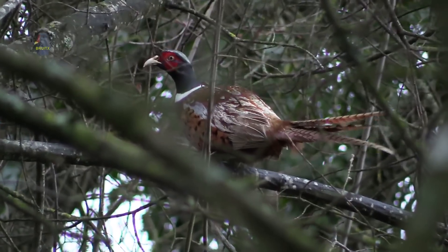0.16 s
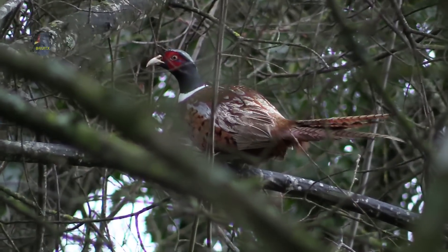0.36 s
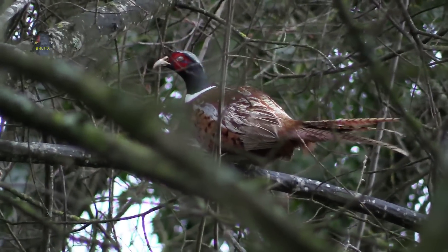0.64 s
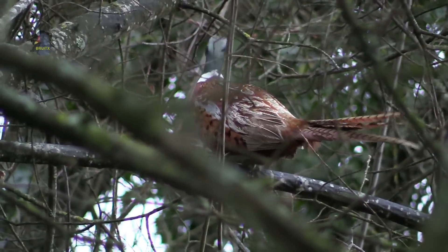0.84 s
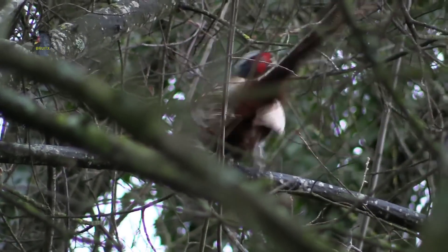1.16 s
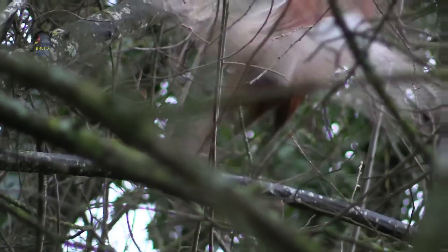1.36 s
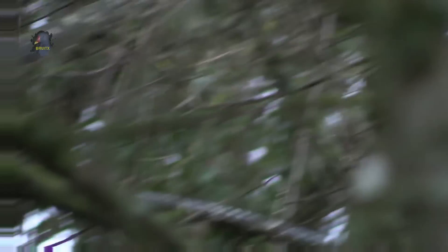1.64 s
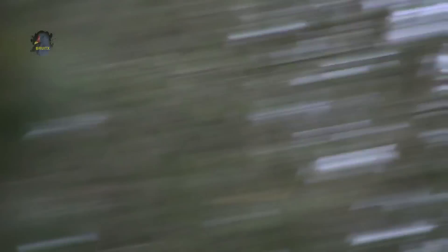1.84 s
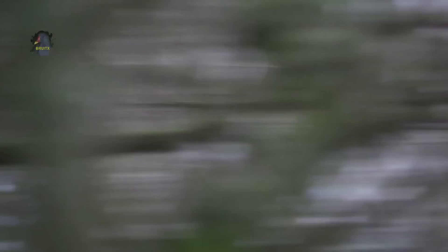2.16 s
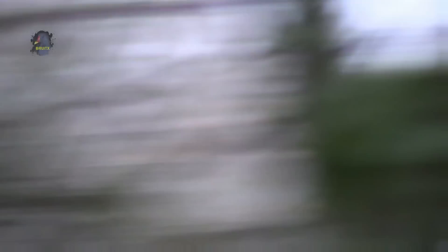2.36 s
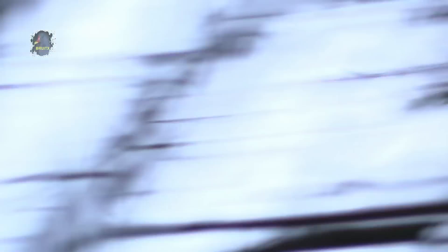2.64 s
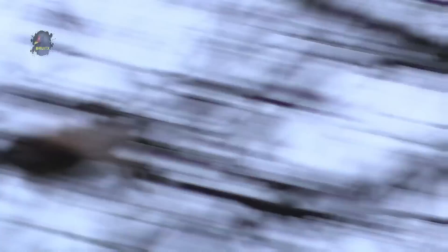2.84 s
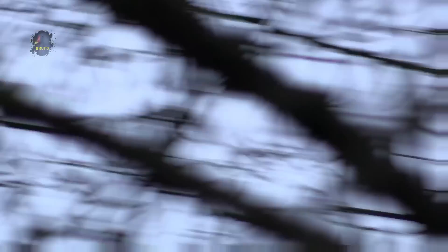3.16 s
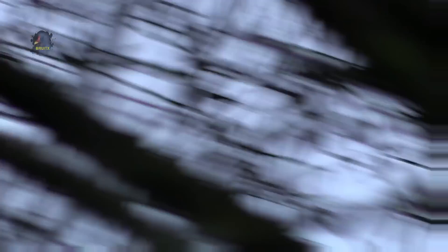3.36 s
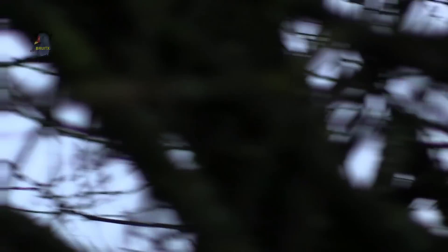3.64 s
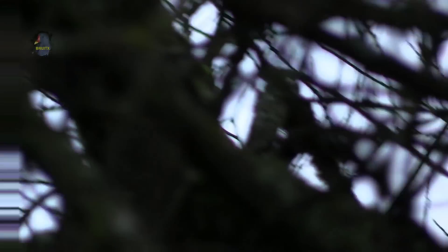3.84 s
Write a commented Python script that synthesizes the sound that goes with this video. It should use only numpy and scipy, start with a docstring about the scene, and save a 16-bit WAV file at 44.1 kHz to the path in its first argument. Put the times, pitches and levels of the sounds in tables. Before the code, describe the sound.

Pheasant taking off among trees: low wind on the microphone and soft small-bird ticking first, then sharp claps, fluttering wings and about twenty short raspy crowing barks, echoing off trunks and gradually fading and dulling.

```python
"""Wind rumble on the microphone, a far wash, and small birds ticking and whistling in a wood.
Then a pheasant bursts off a branch with claps and whirring feathers, and flies away cackling.
Both sides of its syrinx sound at once as pulse trains through a windpipe of resonances, with air noise.
Wings are shaped noise, ticks and whistles gliding tones; near trunks and two decaying tails echo the bird."""
import sys
import numpy as np
from scipy import signal
from scipy.fft import rfft, irfft
from scipy.io import wavfile
from scipy.ndimage import uniform_filter1d, minimum_filter1d

SR = 44100
rng = np.random.default_rng(int(sys.argv[2]) if len(sys.argv) > 2 else 0)


def gain_from_decibels(decibels):
    """Convert decibel values to linear amplitude factors."""
    exponent = np.asarray(decibels, float) / 20
    return 10 ** exponent


def output_pcm(signal):
    """Save a mono or channel-first signal as 16-bit PCM at the path in sys.argv[1].

    Samples are clipped to [-1, 1] before scaling.
    """
    pcm = np.clip(np.atleast_2d(signal).T, -1, 1) * 32767
    wavfile.write(sys.argv[1], SR, np.round(pcm).astype(np.int16))


N = 176400  # samples: 4 s

# Cackles, sag being the level change over the call, upper voice level relative to the lower:
# start_s, length_s, level_db, sag_db, lower_from_hz, lower_to_hz, upper_hz, upper_db, rasp_db
CACKLE_CALLS = [(1.504, 0.067, -20, -3, 715, 809, 1002, 1, 1),
                (1.555, 0.072, -11.5, -9.5, 910.5, 843.3, 1016, 5.5, 2.5),
                (1.65, 0.026, -10, 13, 996.4, 1041, 1037, -6.5, -2),
                (1.736, 0.035, -9, 4.5, 1129, 810, 995, -7.5, 1),
                (1.831, 0.0375, -11, 8, 1169, 878, 1071, -2, -1.5),
                (1.933, .068, -11.5, -7.5, 1118, 670, 900, -8, 0.5),
                (2.072, 0.046, -9, -4, 1166, 826, 756, -8, -0.5),
                (2.192, 0.062, -9.5, -2, 1079, 641.7, 927.4, -8.5, 1.5),
                (2.332, 0.055, -11.5, -6, 1102, 757.3, 990.6, -3, 3),
                (2.484, 0.065, -15, 6, 1129, 755, 927, 1, 0),
                (2.65, 0.059, -10.5, 9, 1099, 714.3, 924.4, -3.5, 1.5),
                (2.806, 0.072, -13.5, -2.5, 936.4, 743.4, 928, 3, -2.5),
                (2.971, 0.0682, -12, -15, 950, 700.4, 990, 1.5, 3),
                (3.112, 0.044, -12.5, 4.5, 1096, 745.4, 928, 1, 3.5),
                (3.264, 0.0606, -16, -6, 985.4, 737, 941, -6, 4),
                (3.319, 0.0364, -23, -3, 1174, 1269, 753, -36, -2),
                (3.451, 0.067, -13.5, -4.5, 1089, 778, 971, 1, 1),
                (3.64, 0.071, -16.5, -10, 850, 619, 893.5, 4.5, -3.5),
                (3.726, 0.026, -18.5, -3.5, 913, 697.5, 903, 7, -5.5),
                (3.862, 0.08, -16.5, -14, 950, 703, 940, -1, 0.5)]
# Neck and beak shift the resonances: time_s, frequency_ratio
NECK_REACH = [(1.5, 1.008), (1.85, 1.05), (2.2, 1.013), (2.5, 1.012), (2.8, 0.99), (3, 1.01), (3.2, 0.95),
              (3.45, 1.002), (3.65, 0.96), (4, 0.96)]
# Windpipe resonances: centre_hz, width_hz, level_db
WINDPIPE = [(850, 363, -1), (1580, 69, -47), (2108, 298, -2.5), (2905, 1800, -27)]
# Raspy treble resonances, before each call's rasp and dulling: centre_hz, width_hz, level_db
RASP_RESONANCES = [(3801, 362, 1), (4576, 920, -9), (4993, 1020, -8), (6620, 1520, -21.5),
                   (8840, 1900, -17), (11200, 7200, -31.5)]
# Treble lost as the bird turns away: time_s, level_at_8_khz_db
TURNING_AWAY = [(1.5, -4.5), (1.9, -0.5), (2.2, -4), (2.5, -5), (2.8, -4.5), (3, -6.5), (3.4, -9.5),
                (3.7, -9.5), (4, -17.5)]
# Wing claps and twig snaps, tilt being treble at 8 kHz against 500 Hz: time_s, peak_db, tilt_db
WING_CLAPS = [(1.241, -41.5, 13), (1.389, -35.5, 5), (1.421, -23, -4), (1.427, -6, 2), (1.444, -17, 6),
              (1.483, -15, 8), (1.559, -8.5, -1), (1.581, -10, 6), (1.719, -15.5, -17), (1.799, -15.5, 0),
              (1.9, -10, 4.5), (2.466, -18, -8), (2.633, -24, -20), (3.169, -13, 0), (3.249, -12.5, -1),
              (3.334, -12.5, 3)]
# Spectrum of a clap before its tilt: frequency_hz, density_db_per_hz
CLAP_SPECTRUM = [(59, -37), (100, -10.5), (301, 2), (944, -4), (2300, -5), (3090, -13), (3440, -13.5),
                 (8020, -19.5), (15800, -40)]
# Whirring wings, before the trims in wings(): time_s, thud_db, hiss_db
WING_WHIRR = [(1.38, -67, -90), (1.43, -40, -33), (1.47, -47, -35), (1.58, -36, -24), (2.2, -39.5, -39),
              (2.22, -43, -8.5), (2.3, -39.5, -33.5), (3.18, -38, -41), (3.71, -45.5, -42),
              (3.85, -44.5, -44), (3.87, -46, -38), (4.0, -45, -46)]
# Decay of the dense tail among the trees: frequency_hz, t60_s
TREE_DECAY = [(500, 0.77), (1300, 0.17), (3500, 0.61), (9000, 0.56)]
# Ticks of a small bird, level being that of the fundamental: start_s, level_db, pitch_hz
BIRD_TICKS = [(.133, -39, 2700), (.193, -40, 2750), (.2956, -40, 2700), (.319, -44, 2650),
              (.465, -50, 2500), (.5146, -44, 2750), (.5692, -44, 2650), (2.4445, -19, 2650),
              (3.2273, -24, 2600), (3.585, -27, 2400)]
# Overtones of a tick, relative to its fundamental: frequency_multiple, level_db
TICK_OVERTONES = [(.45, -13), (1.35, -9), (1.9, -9.5)]
# Far whistles, fuzz being their bandwidth: start_s, length_s, level_db, from_hz, to_hz, fuzz_hz
FAR_WHISTLES = [(.01, .07, -58, 1980, 1960, 20), (.17, .07, -58, 1960, 1900, 20),
                (.34, .05, -58, 1830, 1900, 20), (.51, .08, -60, 1830, 1800, 20),
                (.83, .04, -56, 1760, 1680, 20), (.38, .2, -64, 6250, 6100, 350),
                (.4, .42, -68, 5700, 5700, 500), (.62, .2, -69, 5900, 6200, 400),
                (.3, .68, -66, 4600, 4500, 450)]
# Spectrum of the far wash: frequency_hz, density_db_per_hz
WASH_SPECTRUM = [(53, -60), (90, -4), (205, -7.5), (254, -4), (315, -6), (359, -13.5), (427, -11),
                 (910, -17), (2930, -36), (4510, -36.5), (15800, -47.5)]
# Course of the wash, before the trim in wash(): time_s, level_db
WASH_LEVEL = [(0.0, -42.5), (1.36, -45), (1.63, -35.5), (3.59, -47), (4.0, -45)]
# Course of the wind rumble: time_s, level_db
WIND_LEVEL = [(0.0, -37), (0.28, -33.5), (0.31, -47.5), (0.65, -40), (0.71, -46), (0.82, -34),
              (0.85, -41.5), (1.08, -40.5), (1.11, -32.5), (1.18, -46), (1.32, -37), (1.44, -54),
              (1.66, -38), (1.69, -61), (1.71, -33.5), (2.05, -45), (2.26, -40), (2.56, -43.5),
              (3.35, -42.5), (3.38, -61), (3.41, -44.5), (3.73, -43.5), (3.75, -39.5), (4.0, -52)]
# Spectrum of the left-right hiss: frequency_hz, density_db_per_hz
SIDE_SPECTRUM = [(12, -31), (20, -4.5), (496, -8), (1020, -8), (1150, -21), (1430, -7), (6840, -9),
                 (15800, -26)]

RISE_S, FALL_S = 0.011, 0.0023  # a call's rise, and its fall to 1/e after the call's length
SPRAY_DB_PER_S = -22  # the treble fades during a call, at 8 kHz
BEAK_CLOSE = -0.024  # the resonances sink by this ratio during a call
GLIDE_S, DROOP = 0.014, 0.0496  # early slide of the lower voice, then a droop (ratio per call)
JITTER, WOBBLE_DB = 0.06, 2.5  # rms pitch chance (ratio, at full strife) and rms level chance
COUPLING = 0.4  # product of the two voices, against the upper voice
ROUGH_LOW, ROUGH_PIPE, ROUGH_RASP = 0.1, 0.5, 0.55  # share of air noise at full strife
CLAP_T60_S = 0.049
BEAT_HZ, BEAT_DEPTH = 20, 0.38
THUD_TRIM_DB, HISS_TRIM_DB = 2.5, -11
TREES_DB, NEAR_DB = -10, -8.5  # tail and near trunks, against the dry bird
FAR_DB, FAR_T60_S = -14, 2.07  # long tail, against the dense one; t60 where the dense t60 is 0.32 s
TICK_S, TICK_GLIDE = 0.002, -0.25  # 1/e half-length; pitch ratio change across twice that
WIND_HZ, WIND_WIDTH_HZ = 51, 36
HUM_HZ, HUM_WIDTH_HZ, HUM_DB = 165, 17, -49
SIDE_DB, SIDE_FOLLOW = -43, 0.69  # hiss at a mid level of 0 dB; dB of hiss per dB of mid
CEILING_DB, RECOVER_DB_PER_S = -4.2, 400


def evened(x):
    """Scales to rms 1."""
    return x / np.sqrt(np.mean(x ** 2) + 1e-20)


def read(points, hz):
    """Reads a spectrum on a log frequency axis."""
    f, value = np.transpose(points)
    return np.interp(np.log(hz + 1), np.log(f + 1), value)


def curve(rows, axis=1):
    """One column of a table, for every sample."""
    rows = np.array(rows)
    return np.interp(np.arange(N) / SR, rows[:, 0], rows[:, axis])


def add(mix, start_s, sound):
    """Mixes a sound in at start_s."""
    part = mix[round(start_s * SR):][:len(sound)]
    part += sound[:len(part)]


def resonate(x, hz, width_hz):
    """A resonance of gain 1 that follows hz: shift to zero frequency, smooth, shift back."""
    turn = np.exp(2j * np.pi * np.cumsum(hz * np.ones(len(x))) / SR)
    r = np.exp(-np.pi * width_hz / SR)
    return 2 * (turn * signal.lfilter([1 - r], [1, -r], x / turn + 1e-18)).real


def resonate_twice(x, hz, width_hz, second_width_hz):
    """Two resonances in series, for steeper skirts."""
    return resonate(resonate(x, hz, width_hz), hz, second_width_hz)


def colour(x, points):
    """Filters by a spectrum in dB."""
    hz = np.fft.rfftfreq(len(x), 1 / SR)
    return irfft(rfft(x) * gain_from_decibels(read(points, hz)), len(x))


def drift(noise, hz):
    """Slow chance of rms 1: noise below hz."""
    return evened(signal.sosfilt(signal.butter(2, hz, fs=SR, output="sos"), noise))


def syrinx_voice(hz, unrest, pitch_noise, level_noise):
    """One side of the syrinx: a jittery pulse train of eight harmonics with a wobbling level."""
    turns = np.cumsum(hz * (1 + JITTER * unrest * drift(pitch_noise, 88.17))) / SR
    pulses = sum(np.cos(2 * np.pi * k * turns) for k in range(1, 9))
    return evened(pulses) * gain_from_decibels(WOBBLE_DB * drift(level_noise, 91))


def throat_group(drive, table, ratio, t):
    """Parallel resonances of alternating sign, their treble fading through the call."""
    total = 0
    for k, (hz, width_hz, db) in enumerate(table):
        gain = (-1) ** k * gain_from_decibels(db + SPRAY_DB_PER_S * t * (hz / 8000) ** 2)
        total = total + gain * resonate_twice(drive, hz * ratio, width_hz, 2 * width_hz)
    return total


def cackles():
    """Two pulse trains beat and mix, then pass the windpipe; air noise feeds mostly the rasp."""
    out = np.zeros(N)
    dull_db, reach = curve(TURNING_AWAY), curve(NECK_REACH)
    t = np.arange(6000) / SR
    for start_s, length_s, db, sag_db, from_hz, to_hz, upper_hz, upper_db, rasp_db in CACKLE_CALLS:
        z = rng.standard_normal((5, 6000))
        at = round(start_s * SR)
        lower_hz = to_hz * (1 - DROOP * t / length_s) + (from_hz - to_hz) * np.exp(-(t / GLIDE_S) ** 2)
        strife = np.clip(2.0 * gain_from_decibels(-abs(upper_db)), 0.25, 1)  # two even voices unsettle each other
        lower = syrinx_voice(lower_hz, strife, z[0], z[1])
        upper = syrinx_voice(upper_hz, strife, z[2], z[3])
        voices = evened(lower + gain_from_decibels(upper_db) * (upper + COUPLING * evened(lower * upper)))
        # the voices modulate the air noise
        air = evened(z[4] * (1.2 + abs(voices)) * gain_from_decibels(WOBBLE_DB * drift(z[4][::-1], 220)))
        rise = np.sin(np.pi / 2 * np.clip(t / RISE_S, 0, 1)) ** 2
        shape = rise * np.exp(-np.maximum(t - length_s, 0) / FALL_S) * gain_from_decibels(sag_db * t / length_s)
        rasp = [(hz, width_hz, level_db + rasp_db + dull_db[at] * (hz / 8000) ** 1.88)
                for hz, width_hz, level_db in RASP_RESONANCES]
        beak = reach[at] + BEAK_CLOSE * np.minimum(t / length_s, 1)
        groups = ((WINDPIPE[:1], ROUGH_LOW, 1), (WINDPIPE[1:], ROUGH_PIPE, -1), (rasp, ROUGH_RASP, 1))
        throat = 0
        for table, rough, sign in groups:
            air_share = rough * strife ** 0.5
            drive = ((1 - air_share) * voices + air_share * air) * shape
            throat = throat + sign * throat_group(drive, table, beak, t)
        call_rms = np.sqrt(np.mean(throat[:round(length_s * SR)] ** 2))
        add(out, start_s, gain_from_decibels(db) * throat / call_rms)
    return signal.sosfilt(signal.butter(4, 560, "high", fs=SR, output="sos"), out)


def claps():
    """Wing claps and twig snaps: coloured noise bursts that die away exponentially."""
    out, t = np.zeros(N), np.arange(2048) / SR
    for time_s, peak_db, tilt_db in WING_CLAPS:
        burst = colour(rng.standard_normal(2048), CLAP_SPECTRUM)
        burst = colour(burst, [(500, 0), (8000, tilt_db)]) * gain_from_decibels(-60 * t / CLAP_T60_S)
        add(out, time_s - 0.001, gain_from_decibels(peak_db) * burst / abs(burst).max())
    return out


def whirr():
    """Wingbeats: a low thud and a hiss of feathers, both throbbing at an uneven beat."""
    a, b, c = rng.standard_normal((3, N))
    beat = 1 + BEAT_DEPTH * np.sin(2 * np.pi * np.cumsum(BEAT_HZ * (1 + 0.13 * drift(c, 4.9))) / SR)
    thud = evened(colour(a, [(40, -61), (150, -15), (280, -2), (500, -12.5), (1500, 5), (4000, -53)]))
    hiss = evened(colour(b, [(800, -30), (2500, 9), (7000, 5), (12000, -12), (15800, -32)]))
    thud = gain_from_decibels(curve(WING_WHIRR) + THUD_TRIM_DB) * thud
    hiss = gain_from_decibels(curve(WING_WHIRR, axis=2) + HISS_TRIM_DB) * hiss
    flying = np.clip((np.arange(N) / SR - 1.42) / 0.017, 0, 1)  # take-off at 1.42 s
    return flying * beat * (thud + hiss)


def wings():
    """Sharp claps over the whirr of the wings."""
    return claps() + whirr()


def trees(x):
    """Echoes of a few near trunks, then a dense tail and a faint long one."""
    taps = np.zeros(SR)
    at = np.arange(400, SR - 20, 20)
    taps[at + rng.integers(0, 20, len(at))] = rng.choice([-1., 1.], len(at))
    hz, t, z = signal.stft(taps, SR, nperseg=256)
    t60 = read(TREE_DECAY, hz)[:, None]
    dense = gain_from_decibels(-60 * t / t60)
    long = gain_from_decibels(FAR_DB - 60 * t / FAR_T60_S * 0.32 / t60)
    tail = signal.istft(z * (dense + long), SR, nperseg=256)[1]
    tail = gain_from_decibels(TREES_DB) * tail / np.linalg.norm(tail)
    trunks = np.zeros(len(tail))
    trunks[rng.integers(60, 1300, 8)] = gain_from_decibels(NEAR_DB) / np.sqrt(8) * rng.choice([-1., 1.], 8)
    return signal.fftconvolve(x, tail + trunks)[:N]


def ticks():
    """A small bird's ticks: brief falling tones with overtones under a bell-shaped envelope."""
    out, t = np.zeros(N), np.arange(-300, 900) / SR
    for start_s, db, hz in BIRD_TICKS:
        turns = 2 * np.pi * hz * (t + TICK_GLIDE * t ** 2 / (4 * TICK_S))
        tone = np.sin(turns) + sum(gain_from_decibels(d) * np.sin(k * turns) for k, d in TICK_OVERTONES)
        # the bell peaks 100 samples after start_s
        add(out, start_s - 200 / SR, gain_from_decibels(db) * tone * np.exp(-(t / TICK_S) ** 2))
    return out


def whistles():
    """Faint far whistles: tone and noise through a gliding resonance, the wide ones blurred to hiss."""
    out = np.zeros(N)
    for start_s, length_s, db, from_hz, to_hz, fuzz_hz in FAR_WHISTLES:
        n = round(length_s * SR)
        hz = np.linspace(from_hz, to_hz, n)
        tone = 10 / fuzz_hz * np.sin(2 * np.pi * np.cumsum(hz) / SR)
        breathy = rng.standard_normal(n) + tone
        whistle = evened(resonate_twice(breathy, hz, fuzz_hz, fuzz_hz))
        add(out, start_s, gain_from_decibels(db) * whistle * np.hanning(n) ** 0.5)
    return out


def wash():
    """Far wash: noise of a fixed spectrum, built in short frames, whose level swells and sinks."""
    frames, hz = N // 256 + 5, np.fft.rfftfreq(1024, 1 / SR)
    a, b = rng.standard_normal((2, 513, frames))
    z = (a + 1j * b) * gain_from_decibels(read(WASH_SPECTRUM, hz))[:, None]
    noise = evened(signal.istft(z, nperseg=1024, noverlap=768)[1][:N])
    return gain_from_decibels(curve(WASH_LEVEL) + 3.5) * noise


def wind():
    """Lumpy wind rumble on the microphone and a faint far hum, both noise through low resonances."""
    a, b = rng.standard_normal((2, N))
    rumble = evened(resonate_twice(a, WIND_HZ, WIND_WIDTH_HZ, 2 * WIND_WIDTH_HZ))
    hum = evened(resonate_twice(b, HUM_HZ, HUM_WIDTH_HZ, HUM_WIDTH_HZ))
    return gain_from_decibels(curve(WIND_LEVEL)) * rumble + gain_from_decibels(HUM_DB) * hum


def scene():
    """Everything arrives from the front, alike in both channels; the trees echo the pheasant alone."""
    pheasant = cackles() + wings()
    mono = pheasant + trees(pheasant) + ticks() + whistles() + wash() + wind()
    return np.tile(mono, (2, 1))


def top_cut(x):
    """Nothing passes above the cut-off."""
    return signal.sosfilt(signal.butter(12, 16030, fs=SR, output="sos"), x)


def record(dry):
    """A look-ahead limiter holds the peaks; a little left-right hiss follows the level."""
    over_db = np.maximum(20 * np.log10(abs(dry[0]) + 1e-9) - CEILING_DB, 0)
    fall_db = np.arange(N) * RECOVER_DB_PER_S / SR
    recovering_db = np.maximum.accumulate(over_db + fall_db) - fall_db
    held_db = -minimum_filter1d(-recovering_db, size=89)  # looks 1 ms to either side
    mid = dry / gain_from_decibels(uniform_filter1d(held_db, size=45))
    level = abs(uniform_filter1d(mid[0] ** 2, size=1500)) ** (SIDE_FOLLOW / 2)
    side = gain_from_decibels(SIDE_DB) * level * evened(colour(rng.standard_normal(N), SIDE_SPECTRUM))
    mix = mid + side * np.array([[1], [-1]])  # opposite sign left and right
    return top_cut(mix)


dry = scene()
out = record(dry)
output_pcm(out)
```